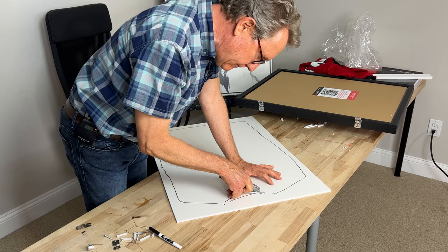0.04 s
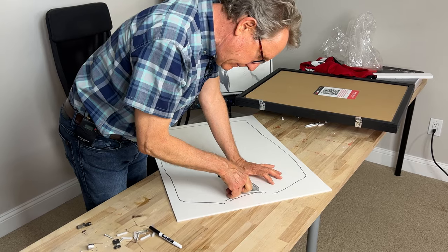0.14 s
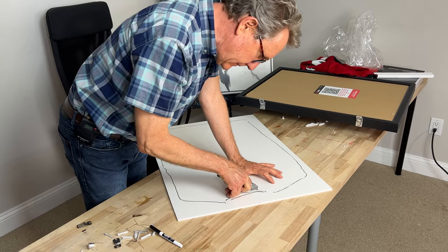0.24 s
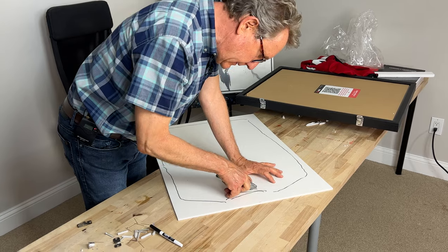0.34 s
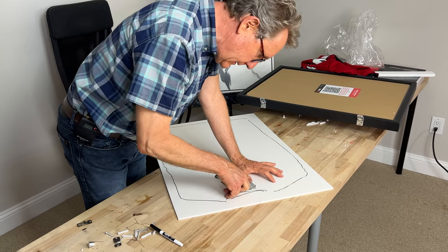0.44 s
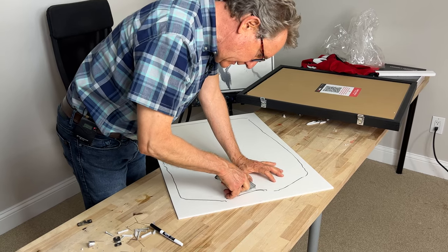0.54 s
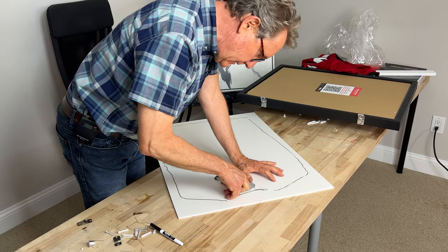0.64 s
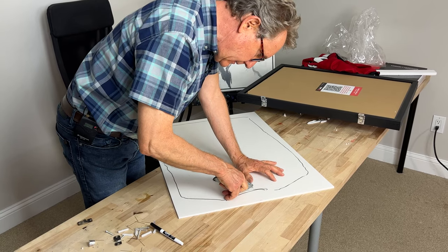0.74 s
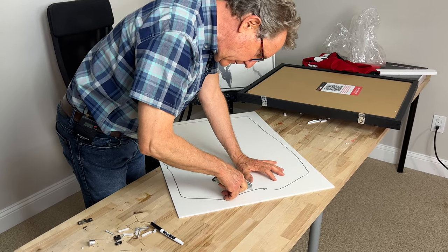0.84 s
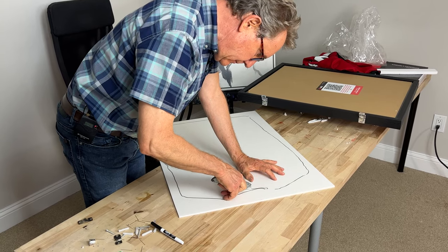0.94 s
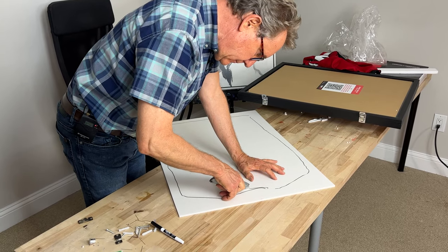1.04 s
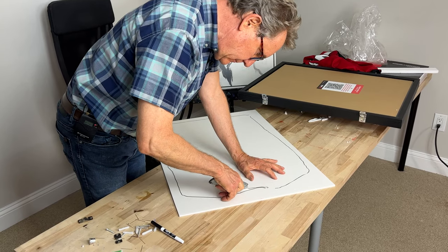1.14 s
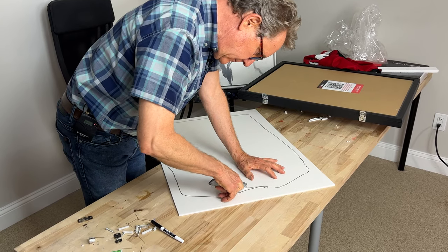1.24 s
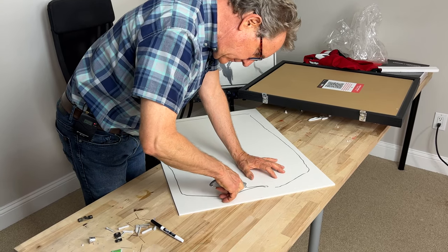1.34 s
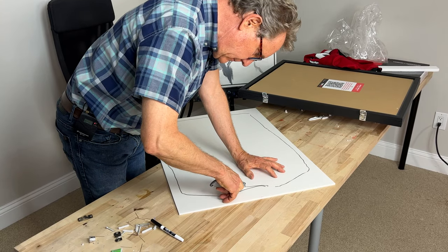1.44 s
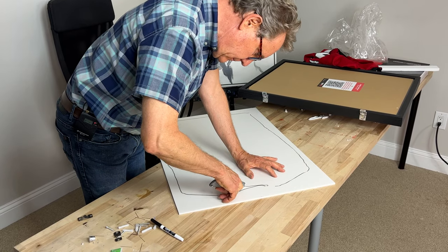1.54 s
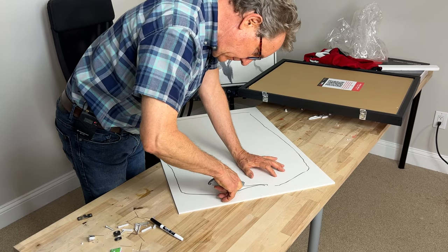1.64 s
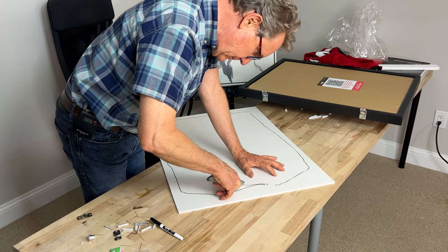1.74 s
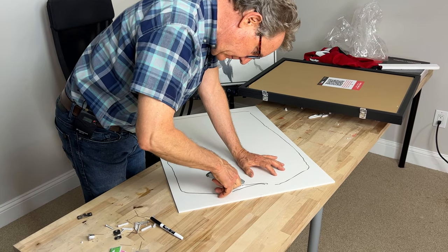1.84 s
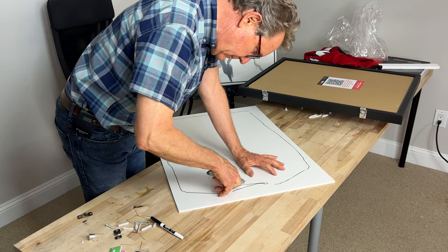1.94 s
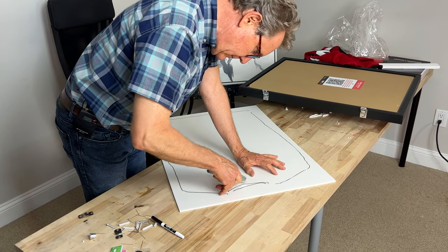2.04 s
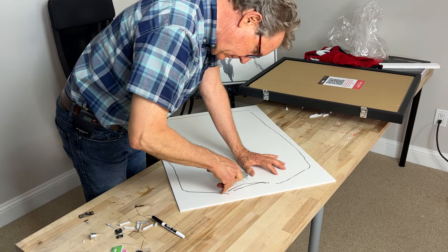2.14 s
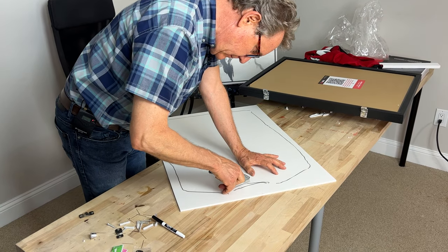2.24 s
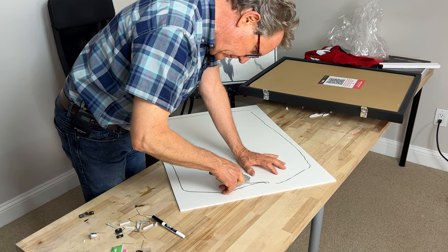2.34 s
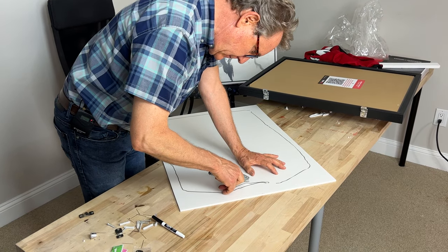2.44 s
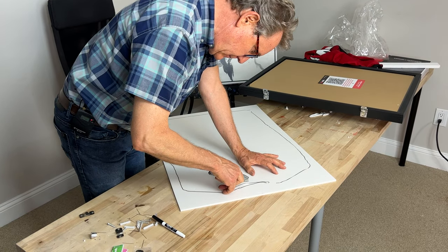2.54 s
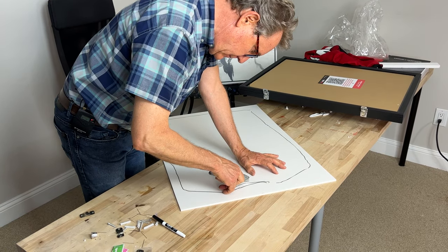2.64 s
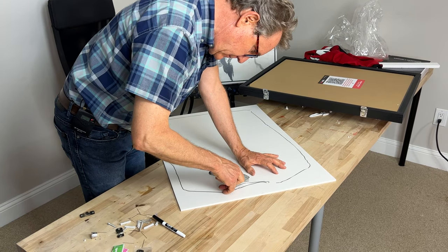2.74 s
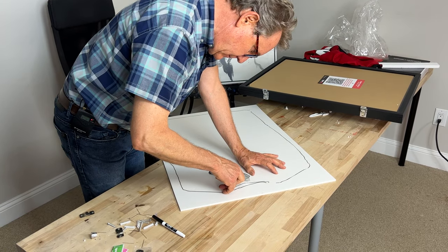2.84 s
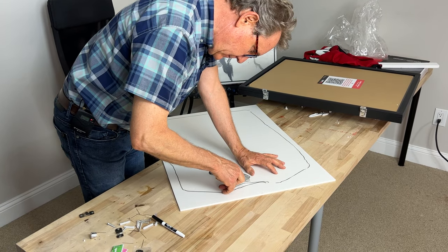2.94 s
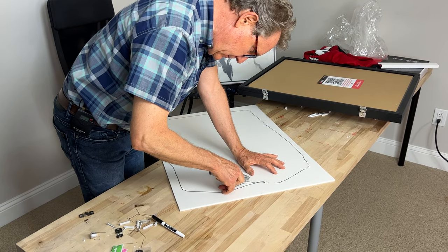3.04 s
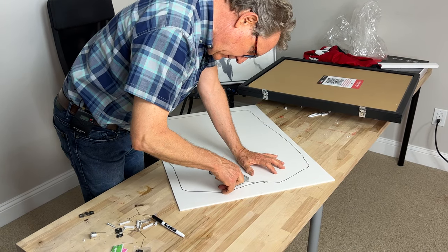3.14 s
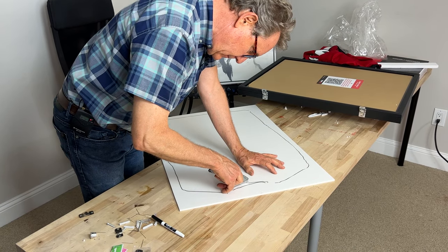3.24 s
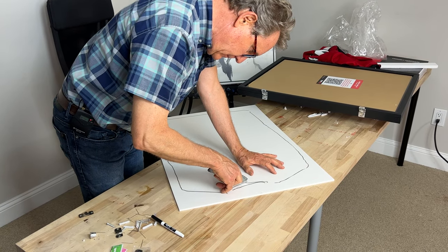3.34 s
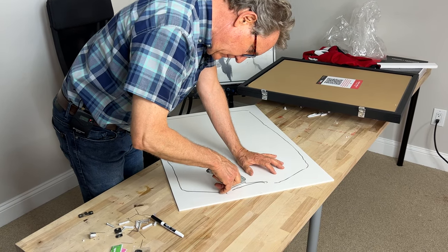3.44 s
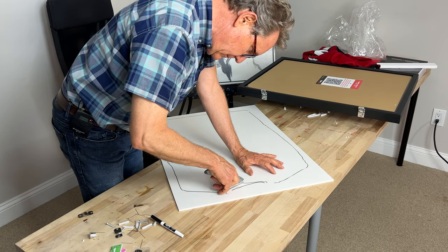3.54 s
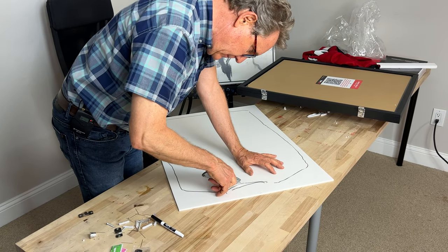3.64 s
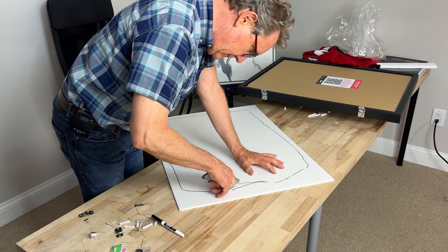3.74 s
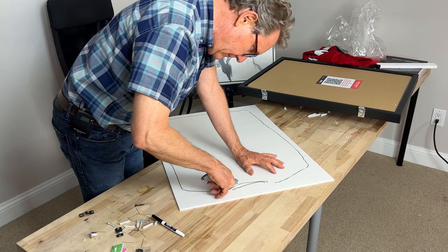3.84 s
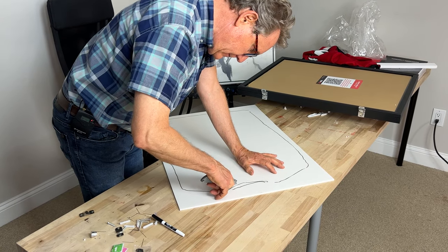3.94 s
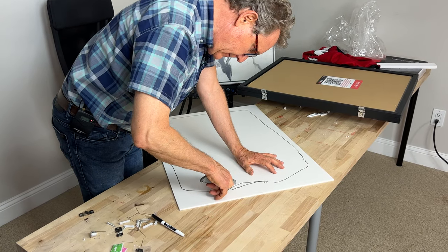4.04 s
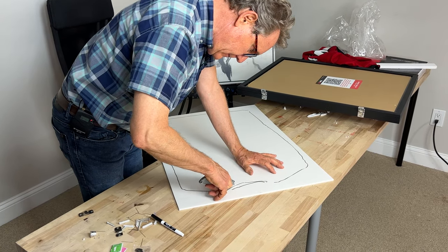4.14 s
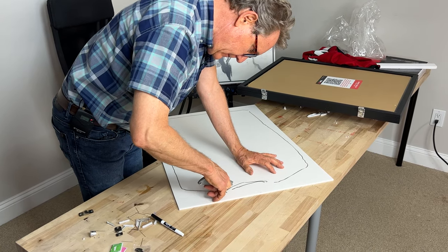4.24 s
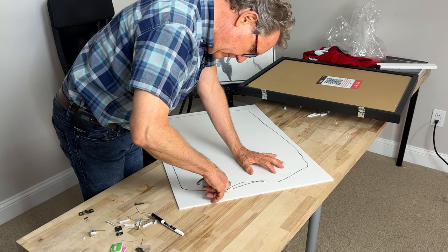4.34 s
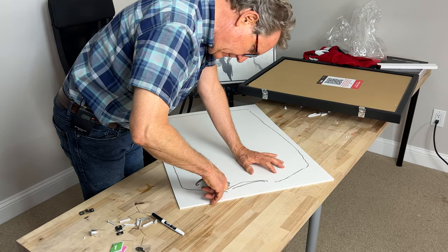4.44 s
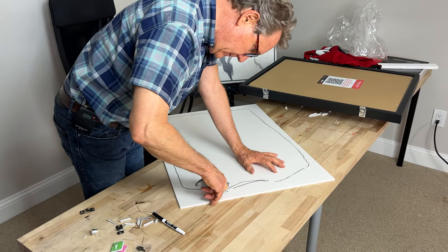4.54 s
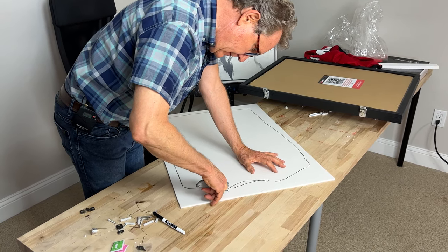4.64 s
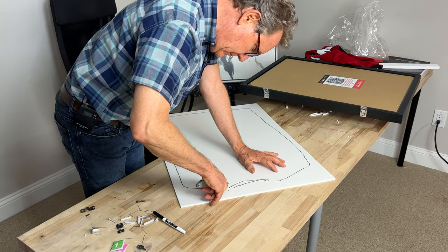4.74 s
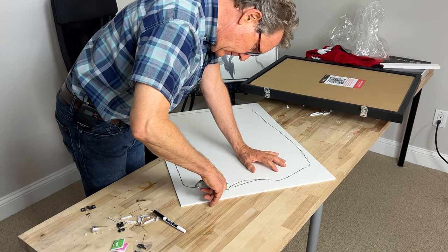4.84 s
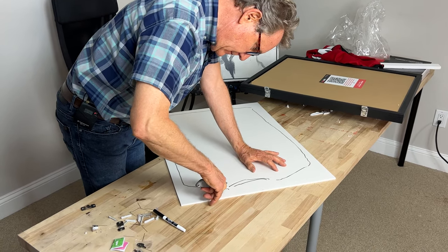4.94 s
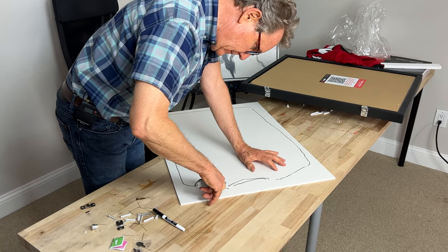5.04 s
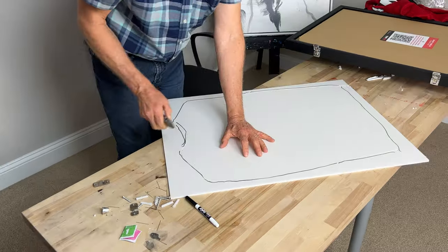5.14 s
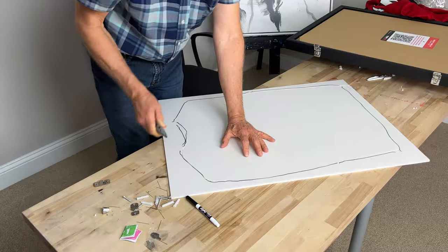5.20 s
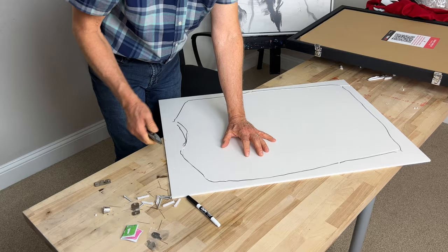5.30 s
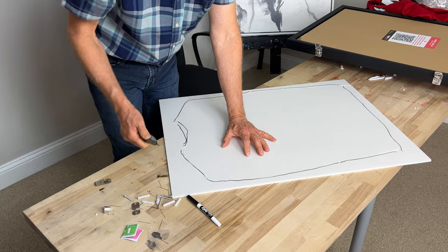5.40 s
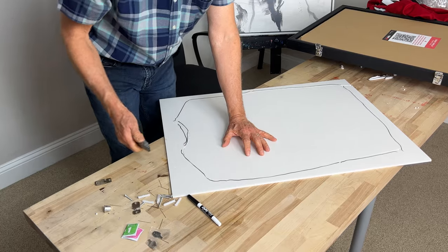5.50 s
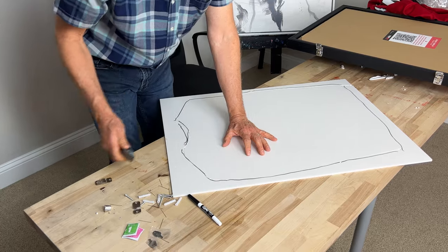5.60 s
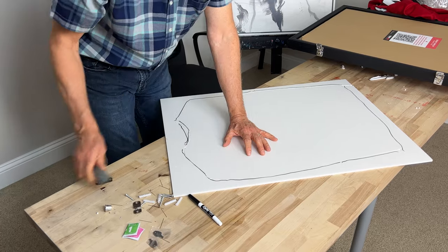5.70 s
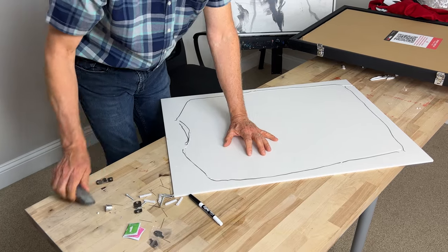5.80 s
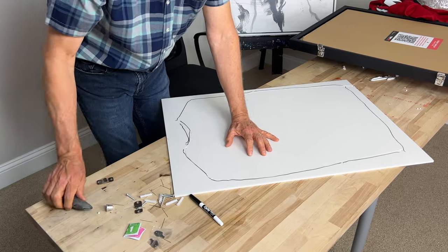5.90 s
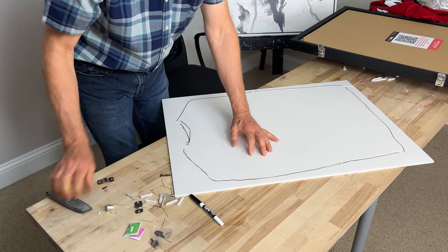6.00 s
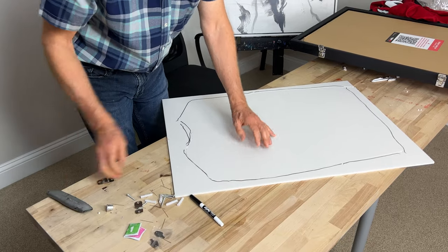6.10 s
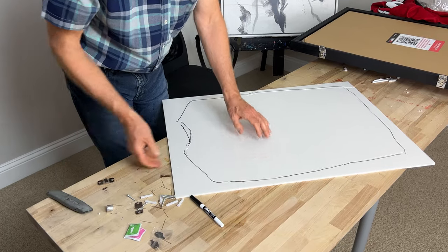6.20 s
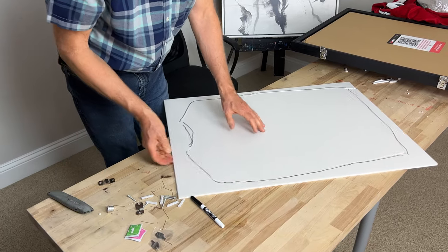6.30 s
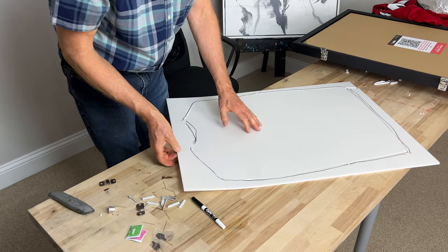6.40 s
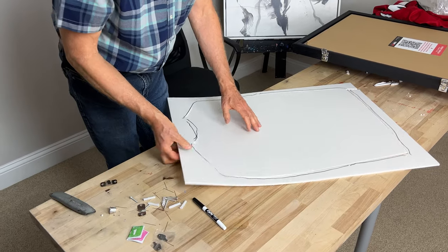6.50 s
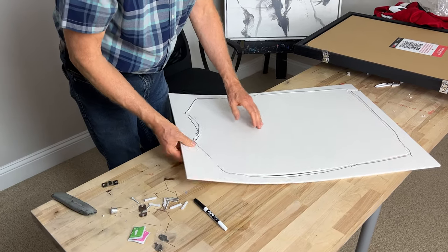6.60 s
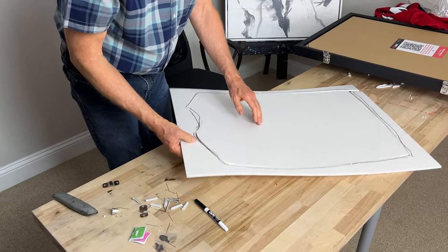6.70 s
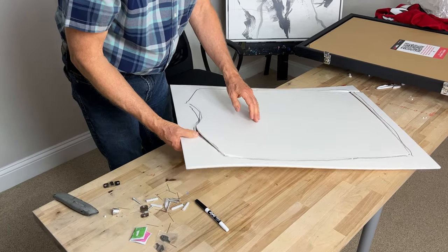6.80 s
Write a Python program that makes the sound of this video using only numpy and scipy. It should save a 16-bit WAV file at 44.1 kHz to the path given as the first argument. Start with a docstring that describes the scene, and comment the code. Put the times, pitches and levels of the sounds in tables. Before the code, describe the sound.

From the start, a utility knife cuts through foam board in short, uneven pushes, a quiet fizzy rasp with the sheet drumming softly beneath it. From about 1.6 seconds the tip only skims the paper, with light scratches, dry ticks, a crisp snag at 2 seconds and a small tap. A second cutting pass runs from 3.4 to about 5.1 seconds, followed by a few dull, low bumps. Between 5.4 and 5.7 seconds the blade clicks back into its handle. At 5.9 seconds the metal knife lands on the wooden workbench, the loudest sound, clattering and rocking briefly while the bench rings. From 6.3 seconds the board rubs and taps on the wood, then creaks and cracks along the cut in several quick snaps, with two low bumps around 6.8 seconds. Everything sounds close, in a small, quiet room.

```python
"""A utility knife cuts foam board in two passes, on a wooden workbench in a small carpeted room.
Foam cells burst under the blade and make the sheet drum; the tip scratches and snags.
The blade clicks back into its handle and the knife is dropped, ringing the bench.
Then the board is dragged up and cracks along the cut."""
import sys
import numpy as np
from scipy import signal
from scipy.fft import rfft, irfft
from scipy.io import wavfile
from scipy.ndimage import uniform_filter1d, map_coordinates

SR = 44100
rng = np.random.default_rng(int(sys.argv[2]) if len(sys.argv) > 2 else 0)


def output_pcm(signal):
    """Save a mono or channel-first signal as 16-bit PCM at the path in sys.argv[1].

    Samples are clipped to [-1, 1] before scaling.
    """
    pcm = np.clip(np.atleast_2d(signal).T, -1, 1) * 32767
    wavfile.write(sys.argv[1], SR, np.round(pcm).astype(np.int16))


N = 302526
TIME = np.arange(N) / SR

# spectrum of snapping cells and fibres: freq_hz, rel_db
SIZZLE_SPECTRUM = [(410, -46), (700, -4.5), (1120, -26), (1720, -31), (2040, -20.5), (3100, -14.5),
                   (4070, -8), (4820, -12), (5860, -4), (6680, -13.5), (7510, -7.5), (13000, -16.5),
                   (15800, -26)]


def cutting():
    """Two passes of the blade through the board, each with its own timbre."""
    # paper facing resonances: freq_hz, width_hz, rel_db
    paper_1 = [(1320, 260, -1), (1893, 68, 0.5), (2960, 195, 0.5), (3200, 120, 3), (3810, 1100, -3)]
    paper_2 = [(1310, 880, 3.5), (2005, 310, 5.5), (2440, 150, -1), (3450, 320, 2.5), (3940, 123, 1.5)]
    # foam fizz spectra: freq_hz, rel_db
    fizz_1 = [(2800, -9), (4000, -16.5), (5000, -2.5), (6500, 0.5), (7600, 0.5), (9800, -0.5), (10600, -5),
              (11400, -5), (13000, -4), (15800, -11.5)]
    fizz_2 = [(3000, -14.5), (4200, -14), (5000, -4.5), (6400, -9.5), (7600, -3.5), (8800, -2.5), (9700, 1),
              (10900, -6.5), (13500, -6), (15800, -12.5)]
    # blade and slit resonances: freq_hz, width_hz, rel_db
    rings_1 = [(3900, 86, 0), (4670, 110, -1.5), (5780, 79, -2), (6440, 130, 5.5), (7450, 210, -4.5),
               (9100, 110, 2.5), (10030, 230, -0.5), (11340, 250, 2.5)]
    rings_2 = [(3550, 66, -1.5), (4040, 84, -0.5), (4830, 120, -1), (5700, 130, -6.5), (6870, 61, -9),
               (8440, 130, -9), (9560, 460, 0), (11200, 93, -9), (11700, 110, -1)]
    first = blade_pass(paper_1, fizz_1, rings_1, span_s=(-0.1, 1.63), echo_s=0.0011, echo_gain=0.3,
                       drag_start_s=-0.05, drag_length_s=1.595, drag_db=-56)
    second = blade_pass(paper_2, fizz_2, rings_2, span_s=(3.34, 5.146), echo_s=0.00145, echo_gain=0.4,
                        drag_start_s=3.35, drag_length_s=1.565, drag_db=-58)
    return first + second


def blade_pass(paper, foam, rings, span_s, echo_s, echo_gain, drag_start_s, drag_length_s, drag_db):
    """The blade bursts foam cells and paper fibres in uneven slips; the sheet radiates the lows."""
    # hand pushes: start_s, length_s, fizz_rel_db, drum_offset_db, rasp_offset_db
    pushes = [(-0.02, 0.042, -47, 3.5, -5), (0.089, 0.12, -49.5, 0, -4.5), (0.24, 0.1, -49, 3, -5.5),
              (0.361, 0.11, -49.5, 4, -9.5), (0.517, 0.036, -58.5, 6, -2.5), (0.673, 0.11, -47, -0.5, -8),
              (0.814, 0.095, -52.5, 1, -6), (0.944, 0.17, -49.5, 3, -7), (1.115, 0.17, -52.5, 1, -9.5),
              (1.437, 0.076, -54, -0.5, -6), (3.41, 0.18, -54.5, 2.5, -8.5), (3.551, 0.15, -48, 4.5, -5.5),
              (3.708, 0.16, -50.5, 2.5, -16), (3.833, 0.12, -50, 0, -9), (4.107, 0.21, -50, -3, -13.5),
              (4.215, 0.2, -47.5, -3, -14), (4.42, 0.16, -52.5, -4, -11.5), (4.762, 0.11, -50.5, -6, -9),
              (5.031, 0.28, -51, -9, -6.5)]
    # sheet drumming spectrum: freq_hz, rel_db
    sheet_spectrum = [(60, -35.5), (130, -4), (200, -6), (280, 1), (400, -1), (560, -2), (800, -14),
                      (1000, -14.5), (1350, -23.5), (2000, -30)]
    # sheet modes: freq_hz, width_hz, rel_db
    sheet_modes = [(146.3, 25, 0), (263.3, 51, -2), (296, 7.5, 2.5), (377, 7.7, -7), (529, 28, -15.5),
                   (526, 44, -16), (650, 72, -2), (836, 23, 0.5)]
    start_s, length_s, push_db, drum_offset_db, rasp_offset_db = np.transpose(pushes)

    def force(push_offset_db, drag_offset_db):
        """Envelope: tiring pushes stand out of a light, steady drag."""
        pushing = strokes(zip(start_s, length_s, push_db + push_offset_db),
                          rise=0.035, sag_db_per_s=8.5, fall=0.054)
        drag = strokes([(drag_start_s, drag_length_s, drag_db + drag_offset_db)],
                       rise=0.035, sag_db_per_s=0, fall=0.022)
        return np.maximum(pushing, drag)

    gate = uniform_filter1d(1.0 * ((TIME > span_s[0]) & (TIME < span_s[1])), 128)
    slips = flutter(per_s=110, depth_db=1.2) * gate
    drum = through(grains(per_s=1500, spread_db=2), colour(sheet_spectrum))
    drum += from_db(-4.5) * through(grains(per_s=1500, spread_db=6.5), resonances(sheet_modes))
    rasp = through(grains(per_s=3000, spread_db=2.5), resonances(paper))
    fizz = through(grains(per_s=16000, spread_db=2.5), colour(foam))
    # reflections off the moving hand and forearm ripple the fizz
    lag_s = echo_s * flutter(per_s=2.48, depth_db=-0.27)
    off_hand = map_coordinates(fizz, [(TIME - lag_s) * SR], order=3)
    off_arm = map_coordinates(fizz, [(TIME - 2.5 * lag_s) * SR], order=3)
    singing = from_db(-6.5) * through(grains(per_s=7400, spread_db=4.5), resonances(rings))
    fizz = rms_one(fizz + echo_gain * off_hand + 0.36 * off_arm + singing)
    return slips * (from_db(-2.52) * force(drum_offset_db, drag_offset_db=-5) * drum
                    + from_db(-3.3) * force(rasp_offset_db, drag_offset_db=-9.5) * rasp
                    + from_db(-2.05) * force(0, 0) * fizz)


def tip_scratches():
    """The tip skims the paper fibres without biting: fine, bright grit."""
    # skims: start_s, length_s, level_db
    skims = [(1.645, 0.26, -55.5), (1.955, 0.047, -61), (2.055, 0.068, -55.5), (2.56, .09, -73.5),
             (2.825, 0.017, -63), (3.19, 0.068, -60.5), (3.27, 0.025, -54)]
    # grit spectrum: freq_hz, rel_db
    grit_spectrum = [(530, -50), (900, -4.5), (1520, -15), (1950, -5.5), (2600, -10.5), (3670, -1),
                     (4040, -8), (4710, -2), (7410, -1.5), (8150, 2.5), (13900, -7), (15500, -7)]
    skimming = strokes(skims, rise=0.029, sag_db_per_s=6, fall=0.035)
    return skimming * through(grains(per_s=14000, spread_db=3), colour(grit_spectrum))


def foam_cracks():
    """Runs of cells give way with a sizzle; the cut edges stick and slip, creaking."""
    # snags and breaks: start_s, length_s, sizzle_db, creak_rel_db, creak_hz
    breaks = [(2.057, 0.032, -41, -51.5, 1160), (3.15, 0.031, -62, -69, 1750),
              (3.194, 0.022, -50.5, -55, 1060), (4.057, 0.011, -54.5, -61.5, 1270),
              (6.464, 0.022, -41, -45, 1800), (6.516, 0.021, -52, -45, 1440),
              (6.585, 0.015, -46, -44.5, 1840), (6.602, 0.0069, -35, -36, 2000),
              (6.704, 0.0076, -35.5, -37, 950), (6.714, 0.027, -44.5, -46.5, 2500),
              (6.765, 0.019, -49, -46, 2350)]
    # crunch spectrum: freq_hz, rel_db
    crunch_spectrum = [(100, 13.5), (300, -2.5), (600, -3), (950, 9), (1400, 4.5), (2200, 8), (2900, -1),
                       (4500, -8), (8000, -29)]
    start_s, length_s, sizzle_db, creak_rel_db, creak_hz = np.transpose(breaks)
    breaking = bursts(start_s, length_s, sizzle_db, rise=0.003, fall=0.0039)
    sizzle = through(breaking * grains(per_s=12000, spread_db=2.5), colour(SIZZLE_SPECTRUM))
    slips = grains(per_s=4900, spread_db=3.5)
    runs, creaks = 0, 0
    for at_s, held_s, db, hz in zip(start_s, length_s, creak_rel_db, creak_hz):
        run = bursts([at_s], [held_s], [db], rise=0.001, fall=0.0039) * slips
        runs += run
        creaks += through(run, resonances([(hz, 170, 0)], size=1024))
    crunch = through(runs, colour(crunch_spectrum))
    return sizzle + from_db(-2.5) * crunch + from_db(-3.5) * creaks


def knife_drop():
    """The metal handle lands, chatters and rocks to rest; the bench top rings on."""
    # landings: start_s, chatter_s, bench_db, clack_db, steel_db
    landings = [(5.9049, 0.0046, -42, -22.5, -40), (5.9387, 0.0064, -36, -27.5, -20.5),
                (5.966, 0.0016, -41, -33, -31), (6.020, 0.0067, -33, -41, -59),
                (6.075, 0.0035, -50.5, -46, -45), (6.1165, 0.0033, -35, -30.5, -59),
                (6.128, 0.0014, -51, -42, -56), (6.229, 0.0018, -52, -66, -53)]
    # bench modes: freq_hz, rel_db, t60_s
    bench_modes = [(131.7, 1, 0.23), (169, -7, 0.43), (243.5, -5, 0.7), (296.5, -6, 0.31), (309.3, 1, 0.23),
                   (378.5, -4, 1), (490, -9.5, 0.31), (576, -19, 0.37), (721, -8.5, 0.3), (736, -7, 0.14),
                   (875, -14, 0.29), (970, -14, 0.24), (950, -8, 0.17), (1016, -14, 0.38),
                   (1100, -10, 0.19), (1150, -16, 0.18), (1362, -17, 0.15), (1780, -34, 0.12),
                   (2490, -36, 0.12)]
    # contact spectrum: freq_hz, rel_db
    clack_spectrum = [(90, -3), (150, -12.5), (400, 5), (750, 5), (1050, 4.5), (1500, -3), (2100, -1),
                      (2900, -7.5), (4000, -4), (5500, -15), (9000, -20), (15000, -40)]
    # knife body modes: freq_hz, width_hz, rel_db
    steel_modes = [(1060, 230, 5.5), (3480, 320, -9.5), (4630, 164, 2), (5620, 530, -6.5),
                   (8400, 2000, -17)]
    start_s, chatter_s, bench_db, clack_db, steel_db = np.transpose(landings)
    rocking = strokes([(5.945, 0.24, -36)], rise=0.0071, sag_db_per_s=43, fall=0.063)
    rattle = rocking * grains(per_s=500, spread_db=3)
    bench = strike(zip(start_s, bench_db), bench_modes)
    bench += through(rattle, resonances([(hz, 18, db) for hz, db, _ in bench_modes]))
    clack = bursts(start_s, chatter_s, clack_db, rise=0.0002, fall=0.0011) * rng.standard_normal(N)
    clack = through(clack, colour(clack_spectrum))
    steel = bursts(start_s, chatter_s, steel_db, rise=0.00035, fall=0.0012) * rng.standard_normal(N)
    steel = through(steel, resonances(steel_modes))
    # close upper modes blur into one tail
    clack = diffuse(clack, t60=0.3, wet_db=-5.5, dull_hz=2270, gap=0.0017)
    steel = diffuse(steel, t60=0.067, wet_db=-11.5, dull_hz=7000, gap=0.00058)
    return bench + clack + steel


def blade_slider():
    """The slider snaps back through its notches; the handle rings briefly."""
    # notches: start_s, level_db, pitch_hz
    notches = [(5.4054, -35.5, 5600), (5.414, -45, 6000), (5.449, -49, 3720), (5.4678, -42.5, 5450),
               (5.4999, -46, 3440), (5.667, -35.5, 4000)]
    # freq_hz, width_hz, rel_db
    handle_modes = [(1900, 500, -7), (7100, 900, -7), (11200, 2000, -12), (750, 500, -13)]
    out = np.zeros(N)
    for start_s, db, hz in notches:
        snap = bursts([start_s], [0.0016], [db], rise=0.00036, fall=0.0014) * rng.standard_normal(N)
        out += through(snap, resonances([(hz, 900, 0)] + handle_modes, size=1024))
    return out


def paper_ticks():
    """Single fibres snap; fainter ones come at random while the tip feels for the cut."""
    # dry ticks: start_s, rel_db
    fibre_snaps = [(1.8966, -35), (1.91, -42), (1.9693, -37), (2.032, -50), (2.566, -45), (2.85, -43.5),
                   (3.3667, -37), (4.061, -32), (6.229, -27)]
    faint = [(rng.uniform(2.56, 3.15), rng.normal(-54, 2)) for _ in range(8)]
    start_s, rel_db = np.transpose(fibre_snaps + faint)
    snapping = bursts(start_s, np.zeros_like(start_s), rel_db, rise=0.00015, fall=0.0014)
    return from_db(-9) * through(snapping * rng.standard_normal(N), colour(SIZZLE_SPECTRUM))


def sheet_taps():
    """The sheet taps the bench and rings briefly."""
    # taps: start_s, level_db
    taps = [(2.3882, -44), (3.692, -54), (4.062, -49), (6.4425, -32)]
    # tapped sheet modes: freq_hz, rel_db, t60_s
    tap_modes = [(268, -10, 0.053), (383, -2.5, 0.062), (507, 9.5, 0.009), (684, -1, 0.033),
                 (1000, -12.5, 0.017), (2470, -17, 0.024), (3870, -16.5, .035), (6400, -19, .012)]
    return strike(taps, tap_modes)


def rubbing():
    """Hands on paper, board on wood: dense contacts merge to a hiss."""
    # rubs: start_s, length_s, level_db
    rubs = [(4.995, 0.035, -63), (5.15, 0.32, -73.5), (5.41, .2, -67), (5.67, 0.38, -67),
            (5.93, 0.034, -45.5), (6.0, 0.267, -55.5), (6.32, 0.1, -42.5), (6.52, 0.59, -49.5)]
    # friction spectrum: freq_hz, rel_db
    friction_spectrum = [(47, -37), (80, 15.5), (376, -1.5), (560, 2.5), (763, 5), (911, -8.5), (1480, -1),
                         (1660, -7.5), (2520, -9), (3590, -1.5), (4190, -4.5), (5710, 0.5), (9290, -0.5),
                         (15800, -14.5)]
    movement = strokes(rubs, rise=0.014, sag_db_per_s=0, fall=0.041)
    return movement * through(grains(per_s=25000, spread_db=4.5), colour(friction_spectrum))


def dull_bumps():
    """Things moved about give bumps a few cycles long, each with a weak overtone."""
    # bumps: start_s, level_db, pitch_hz
    knocks = [(5.144, -36.5, 58.5), (5.17, -33.5, 79.5), (5.204, -24.5, 87), (6.817, -32.5, 79.6),
              (6.842, -28.5, 119)]
    dying_run = [(5.287 + 0.07 * k, -34.5 - 3 * k, 72.4) for k in range(3)]
    fundamentals = knocks + dying_run
    overtones = [(start_s, db - 12.5, hz * 2.22) for start_s, db, hz in fundamentals]
    out = np.zeros(N)
    for start_s, db, hz in fundamentals + overtones:
        at = round(start_s * SR)
        cycles = hz * TIME[:min(SR // 4, N - at)]
        swell = cycles / 0.7
        out[at:at + len(cycles)] += from_db(db) * swell * np.exp(1 - swell) * np.sin(2 * np.pi * cycles)
    return out


def thin_squeak():
    """Three faint, unsteady partials arch up and down in pitch together."""
    start_s, length_s, top_hz, arch_depth = 5.70, 0.21, 9950, 0.085
    progress = np.clip((TIME - start_s) / length_s, 0, 1)
    arch = 1 - arch_depth * (2 * progress - 1.15) ** 2
    pitch_hz = top_hz * arch * flutter(per_s=120, depth_db=0.02)
    phase = 2 * np.pi * np.cumsum(pitch_hz) / SR
    partials = sum(flutter(per_s=40, depth_db=3) * np.sin(ratio * phase) for ratio in (0.975, 1.03, 1.58))
    swell = 2 * np.sqrt(progress * (1 - progress))
    return from_db(-74) * swell * partials


def room_air():
    """Quiet, steady noise, strongest in the bass."""
    # freq_hz, rel_db
    air_spectrum = [(15, -58), (25, -13), (88, -2), (237, -7.5), (293, -12), (427, -14.5), (515, -16.5),
                    (573, -16.5), (621, -20.5), (1390, -24), (1580, -26), (10900, -35), (15000, -39)]
    return from_db(-66) * through(rng.standard_normal(N), colour(air_spectrum))


def from_db(db):
    """Decibels to gain."""
    return 10 ** (np.asarray(db) / 20)


def rms_one(x):
    """Scale to unit power."""
    return x / np.sqrt(np.mean(x ** 2) + 1e-20)


def through(x, response):
    """Pass a sound through an impulse response of unit energy."""
    return signal.oaconvolve(x, response / np.linalg.norm(response))[:N]


def colour(spectrum, size=4096):
    """Causal (minimum-phase) response with a given spectrum."""
    hz, db = np.transpose(spectrum)
    grid = np.maximum(np.fft.rfftfreq(size, 1 / SR), 1)
    cepstrum = irfft(np.log(from_db(np.interp(np.log(grid), np.log(hz), db))))
    cepstrum[1:size // 2] *= 2
    cepstrum[size // 2 + 1:] = 0
    return irfft(np.exp(rfft(cepstrum)))


def resonances(peaks, size=8192):
    """Response of parallel resonances with given widths and peak heights."""
    t = TIME[:size]
    return sum(from_db(db) * width * np.exp(-np.pi * width * t) * np.sin(2 * np.pi * hz * t) * (-1) ** k
               for k, (hz, width, db) in enumerate(peaks))


def strike(blows, modes):
    """Each blow (s, dB) sets all modes (Hz, dB, t60) ringing."""
    t, clicks = TIME[:SR], np.zeros(N)
    for s, db in blows:
        clicks[round(s * SR)] += from_db(db)
    ring = sum(from_db(db - 60 * t / t60) * np.sin(2 * np.pi * hz * t) * (-1) ** k
               for k, (hz, db, t60) in enumerate(modes))
    return signal.oaconvolve(clicks, ring)[:N]


def grains(per_s, spread_db):
    """Tiny fractures at random moments, of uneven size; unit power."""
    sizes = from_db(spread_db * np.minimum(rng.exponential(1, N), 4.5)) * rng.choice([-1, 1], N)
    return rms_one(sizes * (rng.random(N) < per_s / SR))


def bursts(starts, lengths, levels_db, rise, fall):
    """Envelope of contacts that rise, hold and die away."""
    out, t = np.zeros(N), TIME[:SR // 4]
    for s, length, db in zip(starts, lengths, levels_db):
        at = round(s * SR)
        shape = from_db(db) * (1 - np.exp(-t / rise)) * np.exp(-np.maximum(t - length, 0) / fall)
        out[at:at + len(t)] += shape[:N - at]
    return out


def strokes(rows, rise, sag_db_per_s, fall):
    """Envelope of smooth movements: start_s, length_s, level_db; rise and fall in seconds."""
    out, clock = 0, TIME[::32]
    for s, length, db in rows:
        t = np.maximum(clock - s, 0)
        attack = np.sin(np.pi / 2 * np.minimum(t / rise, 1)) ** 2
        release = np.exp(-(np.maximum(t - length, 0) / fall) ** 2)
        out = np.maximum(out, from_db(db - sag_db_per_s * t) * attack * release)
    return np.interp(TIME, clock, out)


def flutter(per_s, depth_db):
    """A gain that wanders at random."""
    knots = rng.standard_normal(4096)
    return from_db(depth_db * np.interp(TIME * per_s, np.arange(len(knots)), knots))


def diffuse(x, t60, wet_db, dull_hz, gap):
    """Add a dense tail of reflections whose treble dies sooner."""
    t, noise = TIME[:SR], rng.standard_normal(SR)
    low = signal.sosfilt(signal.butter(2, min(dull_hz, SR / 3), fs=SR, output="sos"), noise)
    tail = (low * from_db(-60 * t / t60) + .5 * (noise - low) * from_db(-90 * t / t60)) * (t > gap)
    return x + from_db(wet_db) * through(x, tail)


def scene():
    """Bench sounds in a small room, plus dry bumps and room air; mono."""
    near = cutting() + tip_scratches() + foam_cracks() + paper_ticks() + sheet_taps()
    near += rubbing() + blade_slider() + thin_squeak() + knife_drop()
    in_room = diffuse(near, t60=0.29, wet_db=-13.5, dull_hz=6350, gap=0.00541)
    return (in_room + dull_bumps() + room_air())[None]


def record(dry):
    """Steep low-pass on the top treble."""
    cutoff_hz = 15850
    return signal.sosfilt(signal.ellip(12, .1, 80, cutoff_hz, fs=SR, output="sos"), dry)


dry = scene()
out = record(dry)
output_pcm(out)
```